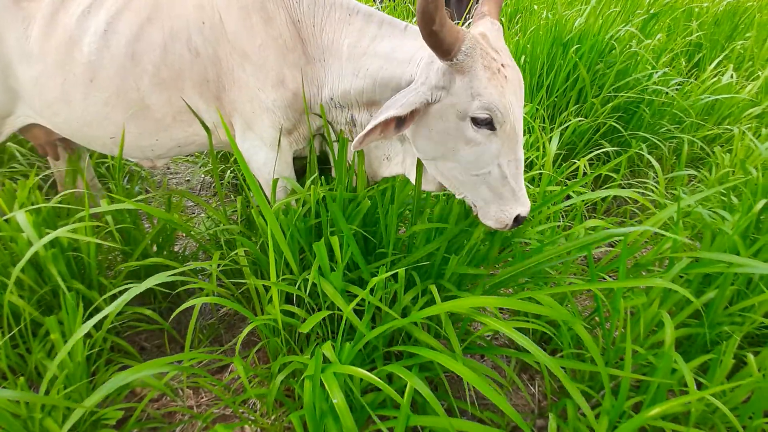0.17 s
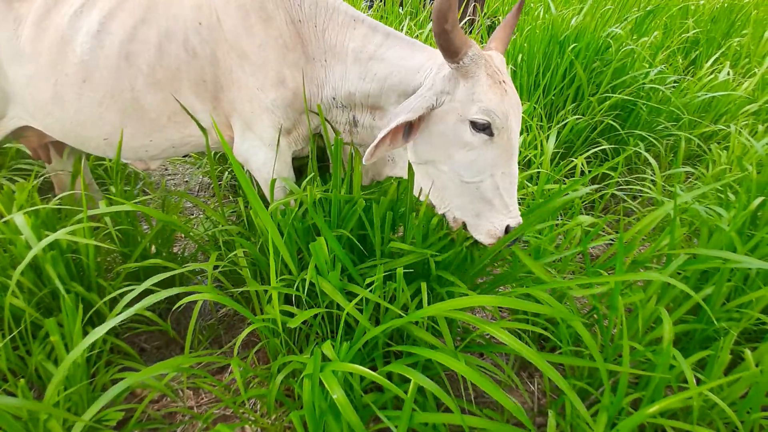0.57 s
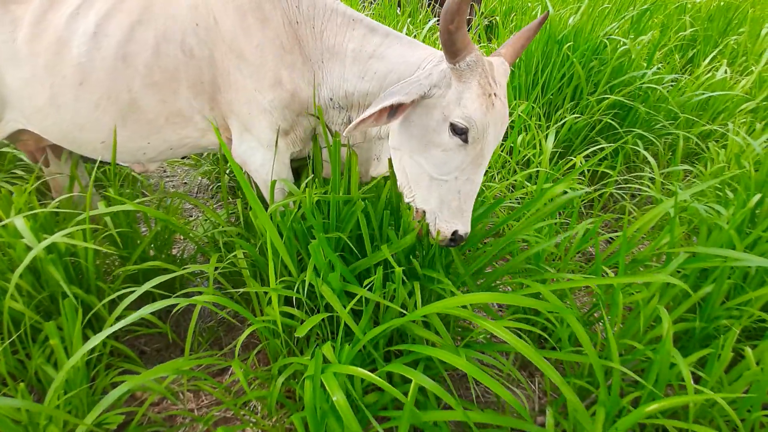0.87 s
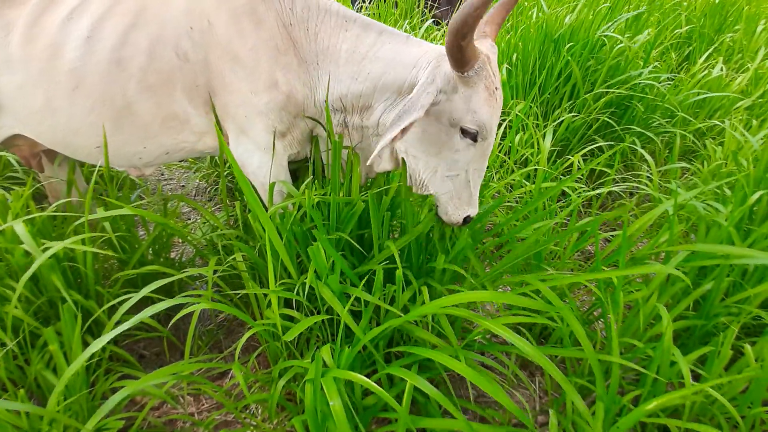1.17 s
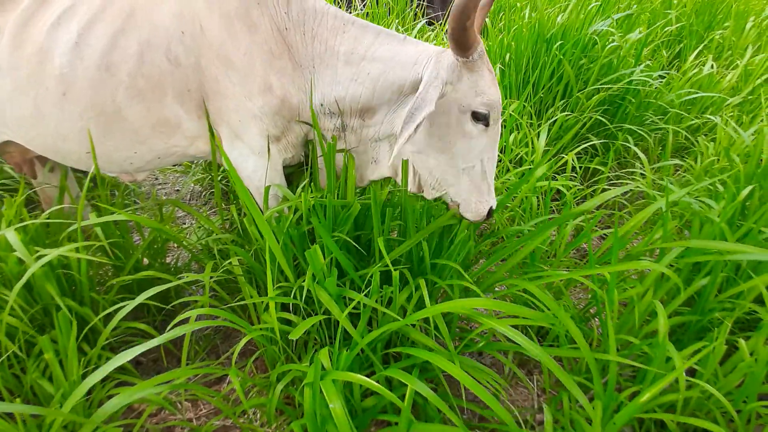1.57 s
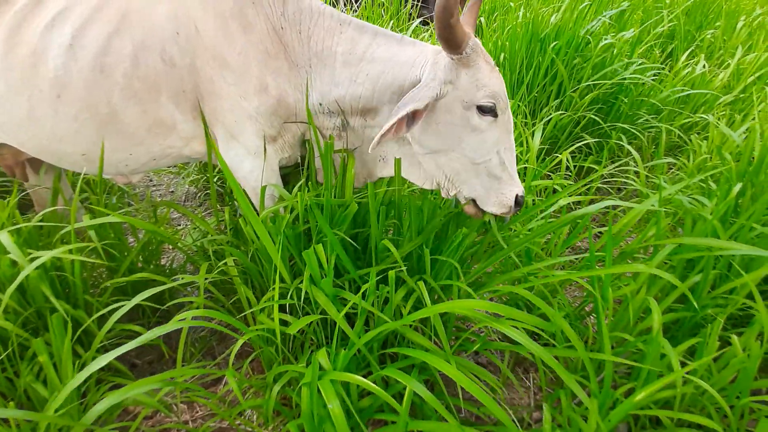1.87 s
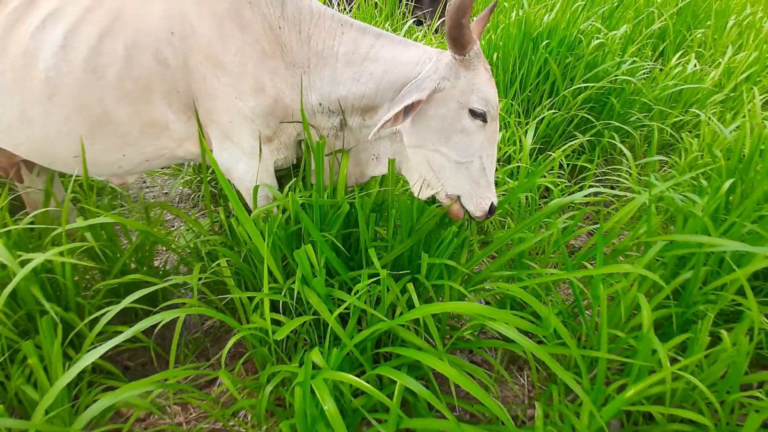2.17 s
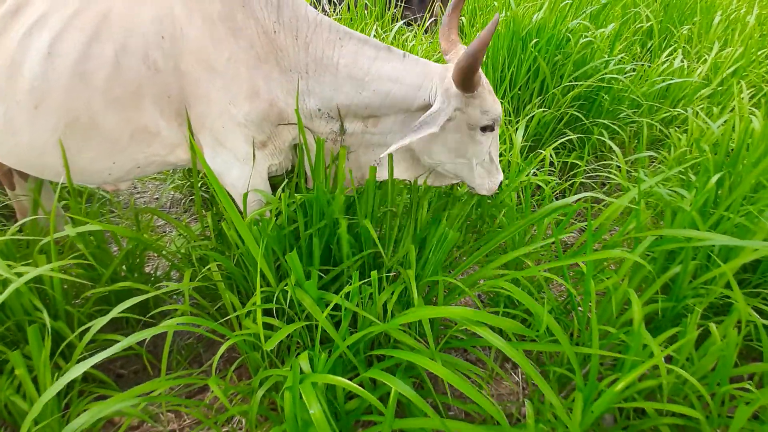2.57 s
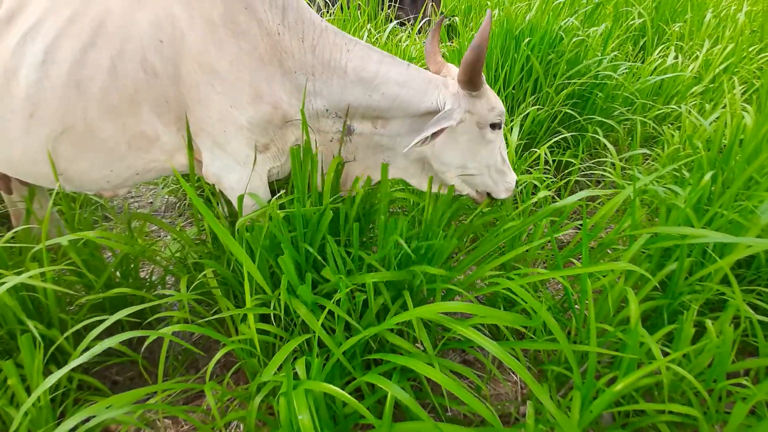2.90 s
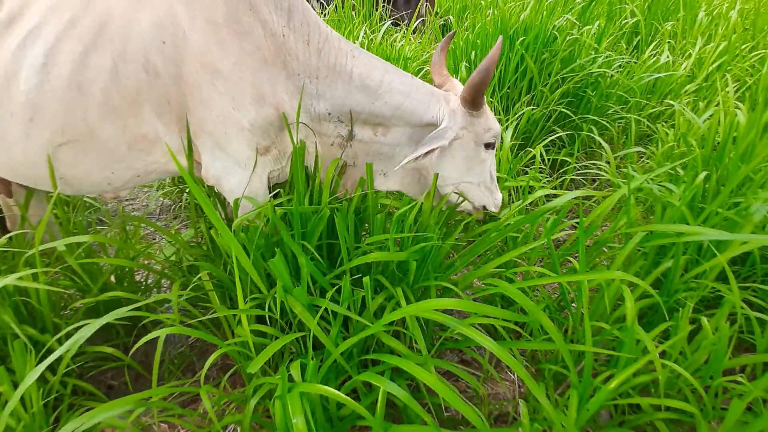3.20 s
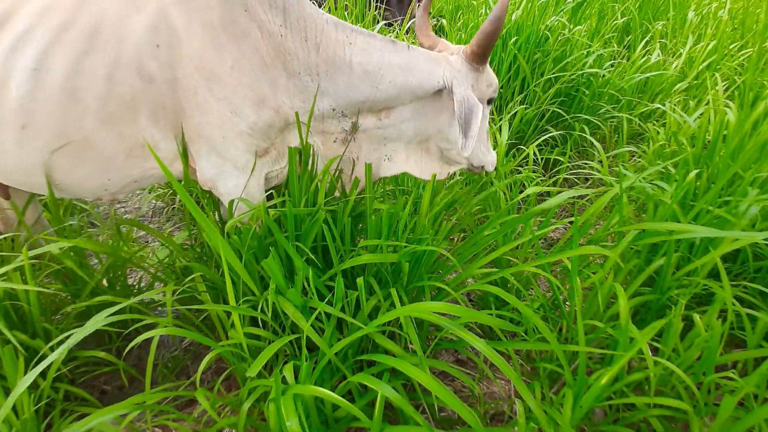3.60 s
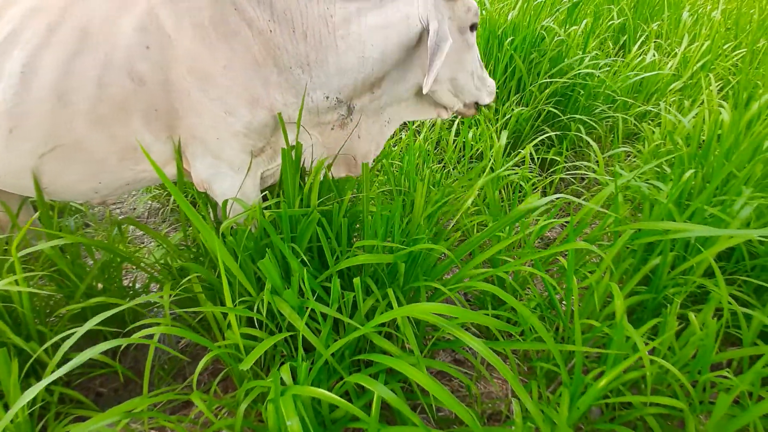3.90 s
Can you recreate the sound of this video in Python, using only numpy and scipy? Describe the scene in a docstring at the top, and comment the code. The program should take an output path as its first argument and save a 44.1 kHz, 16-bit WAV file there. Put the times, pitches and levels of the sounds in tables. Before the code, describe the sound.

Close, crisp rustling of long grass as a cow noses through it in a quiet field, with faint low puffs of wind on the microphone at first. She tugs at creaking stems and rips a mouthful free with a sharp crackle. The blades brush on, then a longer, louder tear comes with snapping and popping stems, before the grazing settles into light scraping and scattered ticks.

```python
"""A cow grazes in tall grass, close to a mono microphone.
Blades scrape past her muzzle in tiny stick-slip clicks; stems rasp, then creak as she pulls them taut.
Stems snap with a bright crack and a hollow pop, and two mouthfuls tear off fibre by fibre.
A light breeze buffets the microphone over a quiet field, with a few dull bumps among the plants."""
import sys
import numpy as np
from scipy import signal
from scipy.fft import rfft, irfft
from scipy.io import wavfile

SR = 44100
rng = np.random.default_rng(int(sys.argv[2]) if len(sys.argv) > 2 else 0)


def waveform_to_disk(signal):
    """Save audio, clipped to [-1, 1], as 16-bit WAV at the path in sys.argv[1]."""
    frames = np.transpose(np.atleast_2d(signal))
    scaled = np.clip(frames, -1, 1) * 32767
    samples = np.round(scaled).astype(np.int16)
    wavfile.write(sys.argv[1], SR, samples)


N = 178605
TIME_S = np.arange(N) / SR


def gain_of(db):
    """Decibels to amplitude."""
    return 10 ** (np.asarray(db) / 20)


def unit_rms(x):
    """Scales to rms 1."""
    return x / np.sqrt(np.mean(x ** 2) + 1e-20)


def add(mix, start_s, sound):
    """Mixes a sound in at start_s."""
    part = mix[max(round(start_s * SR), 0):][:len(sound)]
    part += sound[:len(part)]


def response(spectrum, size=4096):
    """Minimum-phase impulse response of a spectrum, peak 1."""
    hz, db = np.transpose(spectrum)
    bin_hz = abs(np.fft.fftfreq(size, 1 / SR))
    log_gain = np.log(gain_of(np.interp(np.log(bin_hz + 1), np.log(hz), db)))
    ring = np.fft.ifft(np.exp(np.conj(signal.hilbert(log_gain)))).real
    return ring / abs(ring).max()


def colour(x, spectrum):
    """Filters x by a spectrum, to rms 1."""
    return unit_rms(signal.oaconvolve(x, response(spectrum))[:len(x)])


def resonate(x, hz, width_hz):
    """One resonance of gain 1."""
    return signal.lfilter(*signal.iirpeak(hz, hz / width_hz, SR), x)


def wander(rate_hz):
    """Smooth random drift below about rate_hz, rms 1."""
    hz = np.fft.rfftfreq(N, 1 / SR)
    return unit_rms(irfft(rfft(rng.standard_normal(N)) / (1 + (hz / rate_hz) ** 4), N))


def slips(per_s, spread_db):
    """Random stick-slip clicks: many small, a few larger."""
    size = gain_of(spread_db * np.minimum(rng.exponential(1, N), 3))
    return size * rng.choice([-1., 1.], N) * (rng.random(N) < per_s / SR)


def swell(start_s, hold_s, rise_s, fall_s):
    """Exponential rise to 1 at start_s, hold, exponential fall."""
    since_s = TIME_S - start_s
    return np.exp(np.minimum(since_s, 0) / rise_s - np.maximum(since_s - hold_s, 0) / fall_s)


def bell(centre_s, length_s):
    """Gaussian hump of height 1."""
    return np.exp(-(2 * (TIME_S - centre_s) / length_s) ** 2)


# Blades leaning on her body: t/s, level/dB
BODY_CONTACT = [(0, -63), (.7, -55.5), (.92, -63), (1.4, -63.5), (2.0, -58.5), (3.0, -60.5), (3.4, -63),
                (3.94, -68.5), (3.98, -64.5)]
# Muzzle through loose blades: centre t/s, length/s, level/dB
MUZZLE_SWEEPS = [(0.062, 0.17, -54), (0.22, 0.14, -54.5), (0.452, 0.17, -57), (1.014, 0.09, -55.5),
                 (1.347, 0.098, -56.5), (1.6, 0.24, -62.5), (1.755, 0.12, -55.5), (1.908, 0.036, -58),
                 (2.088, 0.052, -53.5), (2.152, 0.043, -54), (3.145, .06, -60.5), (3.28, 0.057, -62.5),
                 (3.519, 0.036, -57.5), (3.708, 0.12, -57.5), (3.866, 0.084, -63.5)]
# Pulls on a tuft: t/s, rise/s, hold/s, brush level/dB, rub level/dB, tautness/0-1
TUFT_TUGS = [(0.519, 0.0082, 0.1, -52, -54.5, 0.35), (0.659, 0.022, 0.04, -51, -53.5, 0.52),
             (0.789, .012, .015, -54.5, -57, 0.66), (1.062, 0.021, 0.068, -54.5, -55.5, .85),
             (1.195, 0.039, 0.047, -48.5, -51.5, 1), (1.753, .03, 0.018, -66, -64.5, .85),
             (2.411, 0.066, 0.087, -53, -55.5, 0.57), (2.453, 0.021, 0.16, -48.5, -50.5, 0.43),
             (2.665, 0.05, 0.12, -50, -55, 0.77), (2.849, 0.046, 0.07, -55.5, -65, .5),
             (2.996, 0.048, 0.33, -70, -68, 0.85), (3.471, 0.042, .015, -64, -59.5, 0.27)]
# Slips of a taut stem: t/s, level/dB
STEM_JERKS = [(1.137, -45), (1.325, -65)]


def grazing(loose_rub_db=-9.5, loose_taut=0.34, jerk_s=0.0073, settle_s=0.061):
    """Her moves add in power; returns brush level/dB, rub level/dB and stem tautness/0-1."""
    brush = gain_of(np.interp(TIME_S, *np.transpose(BODY_CONTACT))) ** 2
    brush += sum(gain_of(db) ** 2 * bell(t_s, length_s) for t_s, length_s, db in MUZZLE_SWEEPS)
    loose = brush * gain_of(loose_rub_db) ** 2
    jerks = sum(gain_of(db) ** 2 * bell(t_s, jerk_s) for t_s, db in STEM_JERKS)
    rub = loose + jerks
    taut_rub = loose * loose_taut + jerks
    for t_s, rise_s, hold_s, brush_db, rub_db, taut in TUFT_TUGS:
        pull = swell(t_s, hold_s, rise_s, settle_s)
        tug_rub = (gain_of(rub_db) * pull) ** 2
        brush += (gain_of(brush_db) * pull) ** 2
        rub += tug_rub
        taut_rub += taut * tug_rub
    return 10 * np.log10(brush), 10 * np.log10(rub), taut_rub / rub


# Scraping leaf edges: f/Hz, gain/dB
BLADE_SPECTRUM = [(200, -25), (330, -16), (520, -22), (900, -13), (2800, -19), (3700, -31.5), (4400, -19),
                  (5200, -7), (6400, -2.5), (8300, 1), (9700, -1.5), (11200, -11.5), (12200, -28.5),
                  (15500, -27.5)]
# Fibre ticks, here and in tears(): f/Hz, gain/dB
FIBRE_SPECTRUM = [(150, -18.5), (500, -13), (780, -15.5), (1200, -15), (1500, -3), (2150, -3), (3000, -1),
                  (3600, -18.5), (4600, -8), (6400, -2.5), (8500, -1), (10800, -1), (12500, -9),
                  (15500, -16)]


def blades(level_db, cutoff_hz=10000):
    """Rough leaf edges scrape in clumps; harder brushing opens the treble and adds fine ticks."""
    force = np.clip((level_db + 66.5) / 12, 0, 1.4)
    scrape = colour(slips(per_s=7000, spread_db=2.5), BLADE_SPECTRUM)
    scrape = unit_rms(scrape * gain_of(1.3 * wander(rate_hz=54)))
    soft = signal.sosfiltfilt(signal.butter(5, cutoff_hz, fs=SR, output="sos"), scrape)
    ticks = colour(slips(per_s=5000, spread_db=3), FIBRE_SPECTRUM) * gain_of(-19 + 8 * force)
    return gain_of(level_db) * (soft + force * (scrape - soft) + ticks)


# Rubbing stems: f/Hz, gain/dB
STEM_SPECTRUM = [(250, -28.5), (550, -36.5), (780, -14.5), (1100, -15), (1450, -11), (1800, -3), (2180, 0),
                 (2550, -2.5), (3050, -11), (3550, -29.5), (4500, -31.5)]
# Creak band of taut stems: f/Hz, width/Hz
CREAK_BAND = (2230, 340)


def stems(rub_db, taut, edge_hz=3190, edge_width_hz=1050):
    """Stems slip on each other in a broad rasp that narrows to a hollow creak when taut."""
    rasp = colour(slips(per_s=2500, spread_db=3.5), STEM_SPECTRUM)
    edge = resonate(resonate(rasp, edge_hz, edge_width_hz), edge_hz, edge_width_hz)
    rasp += edge * gain_of(np.minimum(rub_db + 58, 2))  # hard rubbing sounds sharper
    taut_slips = colour(slips(per_s=1500, spread_db=1.5), STEM_SPECTRUM)
    creak = unit_rms(resonate(taut_slips, *CREAK_BAND))
    creak_share = np.clip(taut, 0, 1) ** 1.41
    friction = np.sqrt(1 - creak_share) * rasp + np.sqrt(creak_share) * creak
    return friction * gain_of(rub_db + 1.13 * wander(rate_hz=81))


# Puffs of breeze: t/s, hold/s, level/dB
BREEZE_PUFFS = [(0.01, 0.6, -68), (0.162, 0.042, -64.5), (0.353, .06, -65.5), (0.475, 0.027, -60),
                (0.742, .045, -61.5), (1.05, 0.38, -85), (2.037, 0.036, -73.5), (2.218, 0.025, -71.5)]
# Wind on the microphone: f/Hz, gain/dB
WIND_SPECTRUM = [(15, -52), (25, -17), (36, -13), (62, -2), (90, -10), (140, -19.5), (250, -33.5),
                 (600, -53)]


def breeze(calm_db=-87.5):
    """Moving air buffets the microphone in low puffs."""
    calm = gain_of(calm_db + 2.3 * wander(rate_hz=17))
    puffs = sum(gain_of(db) * swell(t_s, hold_s, rise_s=0.016, fall_s=0.018)
                for t_s, hold_s, db in BREEZE_PUFFS)
    return (calm + puffs) * colour(rng.standard_normal(N), WIND_SPECTRUM)


# Field background: f/Hz, gain/dB
FIELD_SPECTRUM = [(25, -34), (50, -5.5), (100, 3.5), (200, -2), (330, -1), (550, -3), (900, -7),
                  (1500, -0.5), (2400, -19.5), (3600, -14.5), (7000, -28.5), (15000, -19)]


def field(level_db=-76):
    """The steady hush of the field."""
    return gain_of(level_db) * colour(rng.standard_normal(N), FIELD_SPECTRUM)


def split(decay_s, aftershock, size=1500, per_s=8000):
    """One sharp break, then a dying run of smaller ones in neighbouring fibres."""
    t_s = np.arange(size) / SR
    clicks = rng.choice([-1., 1.], size) * (rng.random(size) < per_s / SR)
    clicks *= aftershock * np.exp(-t_s / decay_s)
    clicks[:10] = 0  # the first break stands alone
    clicks[0] = 1
    return clicks


# Breaking stems and blades: t/s, crack gain/dB, pop gain/dB, split decay/s, ring f/Hz
STEM_BREAKS = [(0.512, -40, -43, .006, 3050), (.681, -36, -58, 0.0059, 3000),
               (.798, -43, -55, 0.0044, 6270), (1.025, -32.5, -48.5, .0038, 880),
               (1.088, -37.5, -55, 0.002, 5650), (1.1843, -24.5, -48, 0.0034, 5800),
               (1.1992, -35, -47, .0023, 7400), (1.2043, -31, -43, .0023, 2030),
               (1.211, -28.5, -35, 0.0015, 2160), (1.218, -31, -44, 0.0021, 1900),
               (1.2355, -37.5, -36, 0.0037, 8500), (1.2405, -45, -40.5, 0.005, 1810),
               (1.4702, -46.5, -49.5, .0036, 7960), (1.5722, -45, -55, .0011, 7650),
               (1.763, -45.5, -55, 0.0053, 8360), (2.092, -40.5, -68, .0024, 8000),
               (2.399, -42, -56, .0038, 8900), (2.4553, -45, -29, .0034, 8750),
               (2.4597, -26.5, -23.5, 0.0012, 1170), (2.4621, -31, -26, .0025, 1810),
               (2.4656, -38, -47, .002, 8700), (2.4792, -36, -29, 0.0038, 6300),
               (2.4932, -37, -26, 0.0028, 7500), (2.504, -19, -23, 0.0012, 5900),
               (2.5058, -29, -18.5, 0.0016, 770), (2.5144, -44, -27.5, 0.0024, 735),
               (2.5318, -35, -49, 0.0045, 7900), (2.5443, -33, -36, 0.0014, 1880),
               (2.577, -38, -35, .0033, 1780), (2.6022, -31, -49, 0.00079, 7300),
               (2.773, -40, -62, 0.0028, 6460), (3.012, -61, -47.5, 0.0023, 1800),
               (3.201, -45, -46, .0037, 2100), (3.295, -47, -60, .0067, 7900),
               (3.489, -57, -52, 0.002, 1990), (3.601, -46, -69, 0.00096, 7140),
               (3.63, -47, -70, .001, 8900), (3.9615, -35.5, -44, 0.0027, 880)]
# Stem skin: f/Hz, gain/dB
CRACK_SPECTRUM = [(1000, -26), (2400, 1), (3600, -35), (4700, -20.5), (6200, -1.5), (8200, 3.5),
                  (10500, -2.5), (12500, -31.5), (15500, -24)]
# Stem core: f/Hz, gain/dB
POP_SPECTRUM = [(150, -35), (400, -17.5), (560, -6.5), (735, -1.5), (960, -4), (1220, 2), (1500, -7.5),
                (1850, 4), (2200, 8), (2900, -2.5), (3600, -22.5), (6000, -56.5)]


def snaps():
    """A stem's skin cracks brightly, its core pops lower, and the broken piece rings briefly."""
    skin, core = response(CRACK_SPECTRUM), response(POP_SPECTRUM)
    out = np.zeros(N)
    for t_s, crack_db, pop_db, decay_s, ring_hz in STEM_BREAKS:
        crack = gain_of(crack_db) * signal.fftconvolve(split(decay_s, aftershock=0.3), skin)
        pop = gain_of(pop_db) * signal.fftconvolve(split(decay_s, aftershock=0.14), core)
        snap = crack + pop
        ring = resonate(snap, ring_hz, width_hz=0.18 * ring_hz)
        add(out, t_s, 0.68 * snap + 2.32 * ring)
    return out


# Bumps among the plants: t/s, level/dB, f/Hz, length/s
PLANT_BUMPS = [(0.58, -75, 353, 0.15), (1.19, -71, 307, 0.063), (3.189, -71, 242, 0.044)]


def bumps():
    """Soft, dull bumps: short swells of low noise with no ring."""
    out = np.zeros(N)
    for t_s, db, hz, length_s in PLANT_BUMPS:
        band = signal.butter(2, [hz / 1.5, hz * 1.35], "band", fs=SR, output="sos")
        thud = unit_rms(signal.sosfilt(band, rng.standard_normal(N)))
        arch = np.sin(np.pi * np.clip((TIME_S - t_s) / length_s, 0, 1))
        out += gain_of(db) * thud * arch
    return out


# Mouthfuls tearing off: t/s, hold/s, level/dB
MOUTHFULS = [(1.2, 0.041, -47), (2.459, 0.1147, -41.5)]


def tears(rise_s=0.0079, straggler_db=-21):
    """A mouthful gives way fibre by fibre in a clumped crackle; the last fibres hold on longer."""
    pull = np.zeros(N)
    for t_s, hold_s, db in MOUTHFULS:
        rip = swell(t_s, hold_s, rise_s, fall_s=0.0033)
        stragglers = gain_of(straggler_db) * swell(t_s, hold_s, rise_s, fall_s=0.15)
        pull += gain_of(db) * (rip + stragglers)
    breaks = slips(per_s=6400, spread_db=3) * gain_of(5.5 * wander(rate_hz=134))
    return pull * colour(breaks, FIBRE_SPECTRUM)


def thicket(x, t60_s=0.16, wet_db=-11, size=8000):
    """Nearby leaves and the ground scatter a short, faint tail."""
    t_s = np.arange(size) / SR
    echoes = rng.standard_normal(size) * (rng.random(size) < 0.06)
    echoes *= (t_s > 0.002) * gain_of(-60 * t_s / t60_s)
    return x + gain_of(wet_db) * signal.oaconvolve(x, echoes / np.linalg.norm(echoes))[:N]


def scene():
    """Grass and air, the same in both channels."""
    brush_db, rub_db, taut = grazing()
    rustle = blades(brush_db) + stems(rub_db, taut)
    breaking = thicket(tears() + snaps())
    mono = rustle + breaking + bumps() + breeze() + field()
    return np.array([mono, mono])


def record(dry):
    """Steep low-pass on the top treble."""
    cutoff_hz = 15850
    low_pass = signal.firwin(511, cutoff_hz, window=("kaiser", 9), fs=SR)
    return signal.oaconvolve(dry, low_pass[None], "same", axes=1)


dry = scene()
out = record(dry)
waveform_to_disk(out)
```